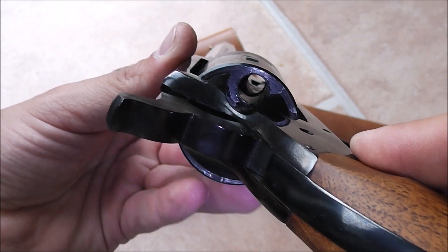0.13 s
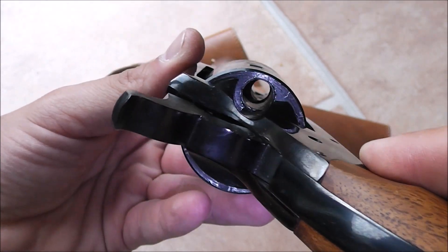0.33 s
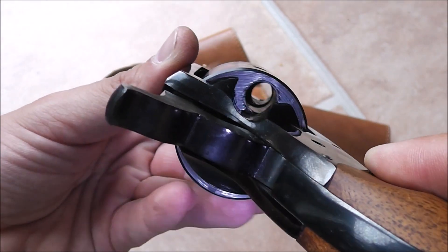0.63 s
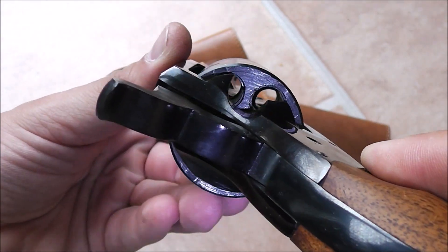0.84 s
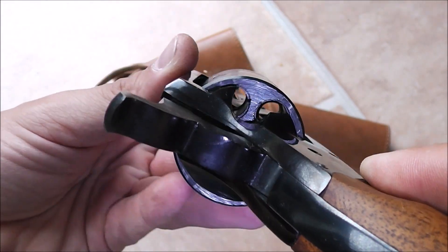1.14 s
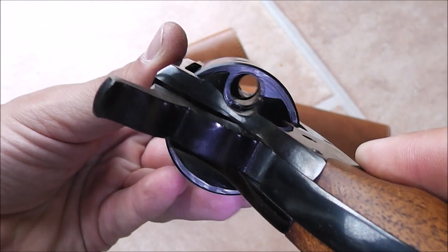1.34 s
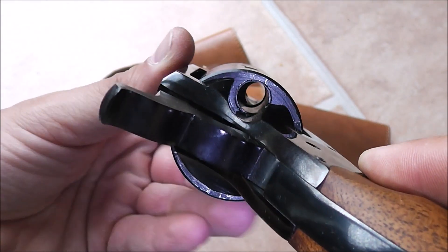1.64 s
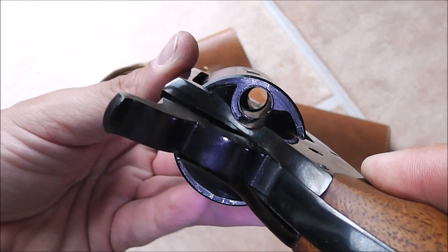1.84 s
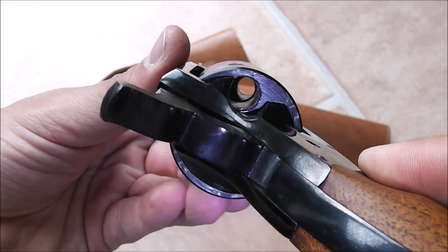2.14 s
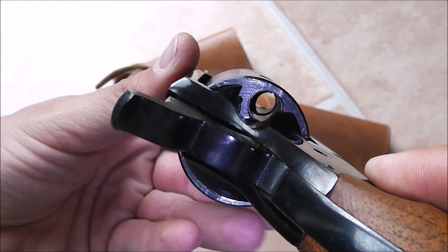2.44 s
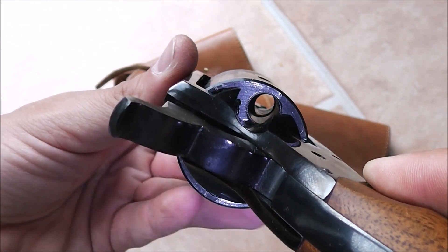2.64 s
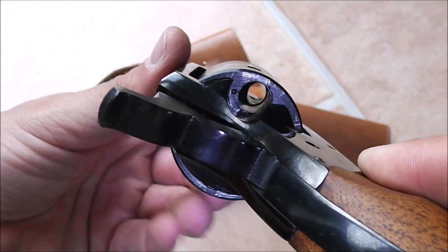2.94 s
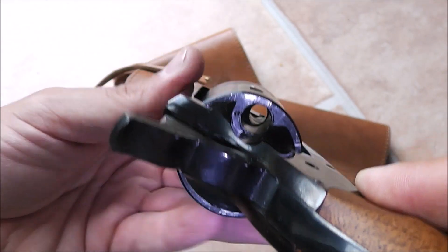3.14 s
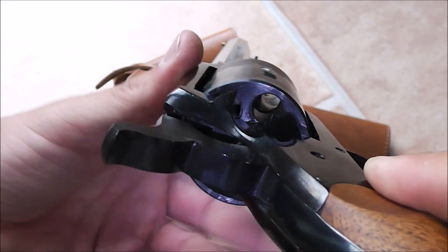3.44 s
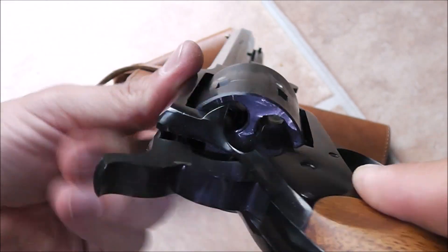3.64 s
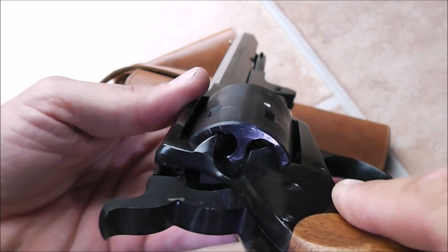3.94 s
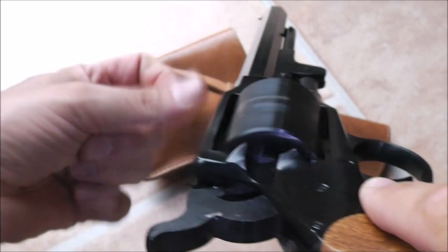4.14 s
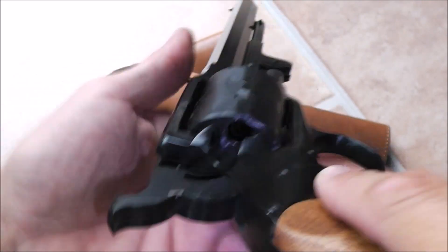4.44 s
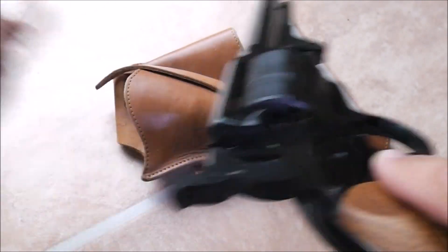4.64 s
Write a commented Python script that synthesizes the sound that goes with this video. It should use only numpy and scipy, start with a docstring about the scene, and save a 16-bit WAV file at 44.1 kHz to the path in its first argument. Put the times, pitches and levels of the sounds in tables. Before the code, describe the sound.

A close, dry stereo pickup in a quiet tiled room. Soft air noise rises during the first quarter second, with faint low grip rumble and a gentle cylinder whirr around 0.5-0.8 s. Sharp single steel snaps, each a bright crack with a very short metallic ring, fall at about 1.4, 2.2 and 2.9 s; the air ducks after each and swells back. At 3.27-3.42 s four clicks run unevenly together. Between 3.57 and 3.9 s the loading gate is shut: light ticks, a dull knock, brief skin hiss and a small clear ring at 3.73. From 4.06 to 4.36 s a rapid ratchet spin clicks about ten times, slowing. A rub and whirr swell near 4.45 s, with a knock at 4.59, then a louder, faster spin from 4.6 to 4.8 s merges into buzzing, hissy metal chatter until the end. Faint short tile reflections follow the clicks.

```python
"""A revolver's steel cylinder is turned by hand close to a camera, in a quiet tiled room.
Over the room's air noise, single pawl snaps come first: a crack of noise and the ring of steel modes.
Then a short spin runs, skin rubs and the loading gate is shut, its ticks, knocks and rings made alike.
Two faster spins follow, where friction noise grows with the speed from tooth to tooth.
The camera's gain control ducks the room noise at every snap and lets it swell back."""
import sys
import numpy as np
from scipy import signal
from scipy.fft import rfft, irfft
from scipy.io import wavfile
from scipy.ndimage import uniform_filter1d, minimum_filter1d

SR = 44100
rng = np.random.default_rng(int(sys.argv[2]) if len(sys.argv) > 2 else 0)


def wav_record(signal):
    """Record a signal, one row per channel, as 16-bit PCM in the file named by sys.argv[1]."""
    frames = np.transpose(np.atleast_2d(signal))
    bounded = np.clip(frames, -1, 1)
    # unit amplitude maps onto the largest positive 16-bit level
    quanta = np.round(bounded * 32767).astype(np.int16)
    wavfile.write(sys.argv[1], SR, quanta)


N = 211544
TIME_S = np.arange(N) / SR
EVENT_S = np.arange(SR // 2) / SR  # time axis of one short event
FINE_HZ = np.fft.rfftfreq(N, 1 / SR)
PORT_HZ = np.fft.rfftfreq(4096, 1 / SR)


def amp(db):
    """The decibel law: 20 dB is a tenfold amplitude."""
    return 10 ** (np.asarray(db) / 20)


def read(points, hz):
    """Interpolates a spectrum on a logarithmic frequency axis."""
    table_hz, value = np.transpose(points)
    return np.interp(np.log(hz + 1), np.log(table_hz + 1), value)


def swell(points):
    """An amplitude envelope: a level curve, linear in decibels, as a gain for every sample."""
    return amp(np.interp(TIME_S, *np.transpose(points)))


def unit(x):
    """Energy normalization: scales each row to the energy of 11 ms at level 1."""
    energy = np.sum(x ** 2, axis=-1, keepdims=True)
    return x * np.sqrt(.011 * SR / energy)


def add(mix, start_s, sound):
    """Superposition: adds a sound to both channels at a time that may lie before the start."""
    start = round(start_s * SR)
    sound = sound[..., max(-start, 0):]
    part = mix[:, max(start, 0):][:, :sound.shape[-1]]
    part += sound[..., :part.shape[1]]


def noise(colour_db, alike):
    """Partial coherence: coloured stereo noise of level 1 with a set left-right correlation."""
    left, other = rfft(rng.standard_normal((2, N)))
    alike = np.clip(alike, -1, 1)
    right = alike * left + np.sqrt(1 - alike ** 2) * other
    x = irfft(np.array([left, right]) * amp(colour_db), N)
    return x / x.std()


def burst(spectrum, decay_s, scatter=0.53, steepness=0.88):
    """Chatter of two parts: a dying swarm of tiny impacts, scattered a little on the way to each port."""
    log_gain = np.log(amp(read(spectrum, abs(np.fft.fftfreq(2048, 1 / SR)))))
    # minimum phase puts the colour's energy at its onset
    colour = np.fft.ifft(np.exp(np.conj(signal.hilbert(log_gain)))).real[:512]
    decay = np.exp(-(EVENT_S / decay_s) ** steepness)
    swarm = rng.standard_normal((3, len(EVENT_S))) * decay
    at_ports = swarm[0] + scatter * swarm[1:]
    return unit(signal.fftconvolve(at_ports, colour[None], axes=1)[:, :len(EVENT_S)])


def ring(clusters, rise_s=0.00079):
    """Modal decay: clusters of close modes beat and die away, struck differently each time."""
    size = len(EVENT_S)
    hz, width, db, t60 = np.transpose(clusters)[:, :, None]
    bands = np.exp(-.5 * ((np.fft.rfftfreq(size, 1 / SR) - hz) / width) ** 2)
    modes = irfft(bands * rfft(rng.standard_normal((len(hz), size))), size)
    envelope = amp(-60 * EVENT_S / t60) * (1 - np.exp(-EVENT_S / rise_s))
    return unit((amp(db) * unit(modes * envelope)).sum(0))


def strokes(rows):
    """Gaussian envelopes: each movement swells and fades, half as strong at the ends of its length."""
    return sum(amp(db) * .5 ** ((2 * (TIME_S - middle) / length) ** 2) for middle, length, db in rows)


# spectrum of the room's air noise: pitch_hz, relative_level_db
AIR_COLOUR = [(15, -30.5), (25, -7), (82, 0.5), (122, -10.5), (209, -5), (340, -9), (399, -6), (684, -8),
              (895, -4), (1140, -7), (1410, -5), (2560, -23), (5730, -15.5), (6920, -17), (15500, -23)]
# level of the room noise, faded in at the start as the recorder's gain recovers: time_s, relative_level_db
AIR_LEVEL = [(0, -68.5), (.25, -58.5), (1.3, -57), (2.6, -61.5), (4.8, -58.5)]
# likeness of the air noise in the two ports: pitch_hz, correlation
AIR_ALIKE = [(60, 0.29), (150, -0.082), (380, -0.39), (2400, -0.26), (6000, -0.22), (15000, 0.31)]


def air(level_db=1.5, hum_hz=883, hum_half_width_hz=45, hum_db=5):
    """A diffuse field: wide room noise under a level curve with one broad resonance."""
    resonance_db = hum_db / (1 + ((FINE_HZ - hum_hz) / hum_half_width_hz) ** 2)
    field = noise(read(AIR_COLOUR, FINE_HZ) + resonance_db, read(AIR_ALIKE, FINE_HZ))
    return amp(level_db) * swell(AIR_LEVEL) * field


# colour of the room's return: pitch_hz, relative_level_db
RETURN_COLOUR = [(100, -2.5), (450, -6.5), (1000, -1), (2200, 5), (3000, -9), (4700, 3.5), (7500, -7),
                 (11000, 0), (15000, -3)]
# reverberation time of the room: pitch_hz, t60_s
ROOM_DECAY = [(200, 0.22), (2000, 0.54), (7000, 0.37), (11000, 0.37), (15000, 0.25)]


def room(x, tail_db=-19.0, bounce_db=-22.0, bounce_s=0.012, build_s=0.0049):
    """Reverberation: one bounce off the tiles and a faint diffuse tail, decaying by frequency."""
    hz, t, z = signal.stft(rng.standard_normal((2, len(EVENT_S))), SR, nperseg=256)
    z = z * amp(read(RETURN_COLOUR, hz)[:, None] - 60 * t / read(ROOM_DECAY, hz)[:, None])
    tail = signal.istft(z, SR, nperseg=256)[1][:, :len(EVENT_S)]
    tail = tail * np.clip(EVENT_S / build_s, 0, 1)
    echo = amp(tail_db) * tail / np.linalg.norm(tail[0])
    echo[:, round(bounce_s * SR)] += amp(bounce_db)
    return signal.fftconvolve(x, echo, axes=1)[:, :N]


# level difference of the microphone pair toward the gun: pitch_hz, left_minus_right_db
BALANCE = [(300, 0.5), (1200, 1.7), (3700, -2.5), (4600, -3), (5600, -1.3), (7600, 0), (10200, -5),
           (11700, -5.5), (12800, -10), (14200, 3.5)]
# phase difference of the pair: pitch_hz, left_lead_rad
LEAD = [(300, -0.96), (8000, -0.18), (11400, 0.55), (12400, 1.5), (14000, 1.8), (16000, 1.5)]


def ports(x):
    """Interchannel difference: the two microphone ports hear the near gun with own level and phase."""
    half = amp(read(BALANCE, PORT_HZ) / 2) * np.exp(.5j * read(LEAD, PORT_HZ))
    taps = np.fft.fftshift(irfft(np.array([half, 1 / half])), axes=1)
    return signal.fftconvolve(x, taps, axes=1)[:, len(PORT_HZ) - 1:][:, :N]  # undo the centring delay


def spin(full_speed_db, power, full_speed=55):
    """Friction as a power law of the coasting cylinder's speed, in teeth a second."""
    snap_s = [row[0] for row in SNAPS]
    coming = np.minimum(np.searchsorted(snap_s, TIME_S), len(SNAPS) - 1)
    speed = abs(uniform_filter1d(snap_speeds()[coming], size=400))
    return amp(full_speed_db) * (speed / full_speed) ** power


# spectrum of the hand's grip rumble: pitch_hz, relative_level_db
RUMBLE_COLOUR = [(25, -17), (75, 2.5), (130, -8), (220, -5), (400, -21), (1500, -39)]
# shifts of the grip in the hand: middle_s, length_s, level_db
SHIFTS = [(.55, 0.16, -59), (.675, 0.04, -59.5), (3.19, .16, -68.5), (3.57, 0.026, -53), (4.57, 0.17, -55)]


def grip_rumble(hold_db=-77):
    """Contact noise: steady rumble of holding, stronger as the grip shifts or the cylinder spins."""
    level = amp(hold_db) + strokes(SHIFTS) + spin(-43.5, 2.1)
    return level * noise(read(RUMBLE_COLOUR, FINE_HZ), 0.71)


# spectrum of the cylinder on its pin: pitch_hz, relative_level_db
PIN_COLOUR = [(150, -17.5), (620, -11), (810, 4), (1000, -5), (1250, -2.5), (1900, -10), (2700, -33.5)]
# the fingers ease the cylinder round: middle_s, length_s, level_db
TURNS = [(.725, 0.13, -59), (1.71, 0.093, -56.5), (2.77, 0.12, -61), (3.14, 0.15, -61.5),
         (4.48, 0.62, -52.5)]


def pin_whirr():
    """Bearing friction: the cylinder whirrs on its pin, eased by fingers or coasting."""
    return (strokes(TURNS) + spin(-42.5, 2.3)) * noise(read(PIN_COLOUR, FINE_HZ), 0.61)


# spectrum of skin and pawl over steel: pitch_hz, relative_level_db
SKIN_COLOUR = [(500, -14), (3000, -16), (6500, -11.5), (9500, -1), (11500, -7), (15500, -9)]
# strokes of skin over the steel: middle_s, length_s, level_db
RUBS = [(.44, .08, -65.5), (.94, .03, -60.5), (3.22, 0.17, -60.5), (3.585, 0.03, -42.5),
        (3.65, 0.054, -44.5), (3.745, .03, -51), (4.04, 0.058, -62.5), (4.46, 0.15, -38.5),
        (4.59, 0.045, -35)]


def skin_hiss():
    """Sliding friction: skin and pawl hiss over the steel as broadband noise."""
    return (strokes(RUBS) + spin(-23, 1.36)) * noise(read(SKIN_COLOUR, FINE_HZ), 0.81)


# light taps of the gate and fingers: start_s, tick_db, knock_db, ring_db
TAPS = [(3.109, -61, -59, -74), (3.5665, -38, -47.5, -62), (3.634, -43.5, -43, -69),
        (3.7346, -37, -57, -40.5), (3.898, -57, -64.5, -52.5), (4.018, -63, -64, -69),
        (4.588, -52, -36.5, -73)]
# spectrum of the gate's tick: pitch_hz, relative_level_db
TICK_COLOUR = [(300, -38), (2100, -9.5), (3300, -37.5), (4400, 1.5), (6000, -4), (7000, -11.5), (8100, 2),
               (9500, -14.5), (15000, -28)]
# modes of the grip's knock: pitch_hz, width_hz, relative_energy_db, t60_s
GRIP_MODES = [(591, 31, 3.5, 0.032), (916, 27, -3.5, 0.069)]
# modes of the gate's ring: pitch_hz, width_hz, relative_energy_db, t60_s
GATE_MODES = [(5550, 510, 8, 0.024), (5500, 160, 0.5, 0.31)]


def gate(tick_s=0.0017):
    """Light impacts: the loading gate is nudged and shut; the grip answers with a dull knock."""
    out = np.zeros((2, N))
    for start_s, tick_db, knock_db, ring_db in TAPS:
        tick = amp(tick_db) * burst(TICK_COLOUR, tick_s)
        knock = amp(knock_db) * ring(GRIP_MODES)
        add(out, start_s, tick + knock + amp(ring_db) * ring(GATE_MODES))
    return out


def snap_speeds(spin_gap_s=.15):
    """Rate is the inverse of period: teeth a second at each snap, zero where pushed from rest."""
    gap = np.diff([row[0] for row in SNAPS], prepend=-np.inf)
    return np.where(gap < spin_gap_s, 1 / gap, 0)


def microphone_overload(corner_hz=1150.0, damping=0.52):
    """Microphone overload: each snap adds one dull low push, shaped as a damped swing, without room sound."""
    out = np.zeros((2, N))
    turn = 2 * np.pi * corner_hz * EVENT_S
    swing = np.sin(turn) * np.exp(-damping * turn)
    push = unit(signal.sosfilt(signal.butter(3, 1900, fs=SR, output="sos"), swing))
    for (start_s, blow_db, ring_db), speed in zip(SNAPS, snap_speeds()):
        if speed:
            push_db = -13.5 - 0.1666 * speed  # in a spin the push weakens with speed
        else:
            push_db = -8 - 0.27 * ring_db  # at a single snap it is stronger where the ring is weaker
        add(out, start_s, amp(blow_db + push_db) * push)
    return out


# pawl snaps, rings relative to the blow: start_s, blow_db, ring_db
SNAPS = [(-.19, -10, 1), (1.3768, -10, 3.5), (2.2348, -7, -5), (2.8919, -9, 0), (3.2713, -6.5, -11.5),
         (3.3094, -14.5, 7), (3.3509, -13, 5), (3.4187, -10.5, 2.5), (4.0568, -4.5, 2), (4.091, -5, 4.5),
         (4.1136, -4.5, 0), (4.1352, -7, 5.5), (4.16, -7, 4), (4.186, -6.5, 5), (4.215, -3.5, -13),
         (4.2481, -9.5, 9), (4.291, -7, 1.5), (4.3575, -7, 7), (4.6059, 0, 4), (4.6325, -4.5, 4),
         (4.651, 0, 3), (4.6659, -2.5, 1), (4.681, -3.5, 7), (4.6964, -3, 0.5), (4.7136, -2, 1),
         (4.731, -0.5, -4), (4.7501, -2, 2), (4.769, -6, -28.5), (4.7902, -4, -4)]
# spectrum of the crack of steel on steel: pitch_hz, relative_level_db
CRACK_COLOUR = [(60, -20), (500, -21), (1200, -12.5), (2150, -16.5), (2500, -26.5), (3600, -13.5),
                (4600, -10), (6300, -5), (8600, 0), (12000, -1.5), (14300, -4), (15500, 0)]
# clusters of close modes in cylinder and frame: pitch_hz, width_hz, relative_energy_db, t60_s
STEEL_MODES = [(7650, 39, -2.5, 0.018), (7470, 240, 0.5, 0.021), (4610, 140, -15.5, .025),
               (2143, 130, -20, 0.023), (2845, 100, -24.5, 0.032), (10540, 270, -7.5, 0.015),
               (7410, 270, -17, 0.42)]


def ratchet(crack_gain_db=5.0, ring_gain_db=-4.0):
    """Impact excitation: each pawl snap is a crack and the ring of the steel's modes."""
    out = np.zeros((2, N))
    for (start_s, blow_db, ring_db), speed in zip(SNAPS, snap_speeds()):
        # the pawl chatters longer the faster the cylinder spins
        chatter_s = 0.0022 + .000024 * speed if speed else .0017
        crack = amp(crack_gain_db) * burst(CRACK_COLOUR, chatter_s)
        steel = amp(ring_db + ring_gain_db) * ring(STEEL_MODES)
        add(out, start_s, amp(blow_db) * (crack + steel))
    return out


def scene():
    """Superposition of the gun close by, its room, the hands and the air."""
    gun = ratchet() + gate()
    hands = skin_hiss() + grip_rumble() + pin_whirr()
    return ports(gun + microphone_overload()) + room(gun) + hands + air()


def record(dry, limit_db=-21.0, squeeze=0.8, hold_s=0.18, recover_db_per_s=56.0, ceiling=1.0):
    """Compression: gain drops at once, holds, then recovers; peaks are rounded and the band limited."""
    power_db = 10 * np.log10(abs(uniform_filter1d((dry ** 2).mean(0), size=265)) + 1e-12)
    over_db = np.clip(squeeze, 0, 1) * np.maximum(power_db - limit_db, 0)
    half = int(hold_s * SR / 2)
    # the largest reduction of the past hold time
    held_db = -minimum_filter1d(-over_db, 2 * half + 1, origin=half, mode="nearest")
    # a running maximum on a slope lets the reduction fall only at the recovery rate
    fall_db = TIME_S * recover_db_per_s
    duck_db = uniform_filter1d(np.maximum.accumulate(held_db + fall_db) - fall_db, size=60)
    rounded = ceiling * np.tanh(dry * amp(-duck_db) / ceiling)
    low_pass = signal.firwin(201, 15800, window=("kaiser", 7), fs=SR)  # cutoff in Hz
    return signal.oaconvolve(rounded, low_pass[None], "same")


dry = scene()
out = record(dry)
wav_record(out)
```